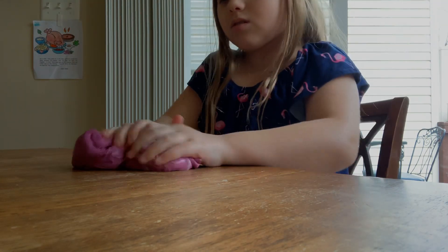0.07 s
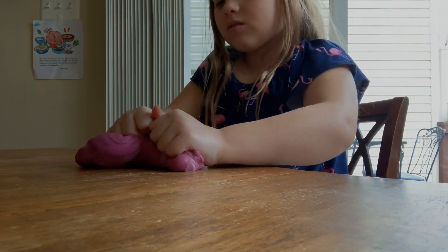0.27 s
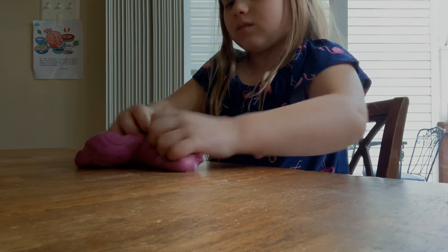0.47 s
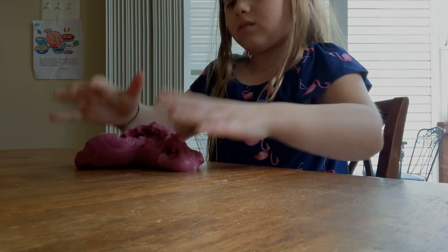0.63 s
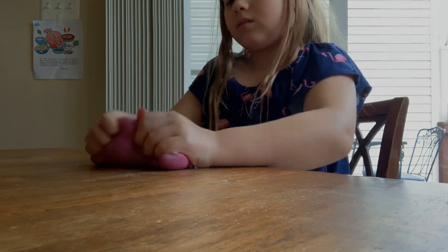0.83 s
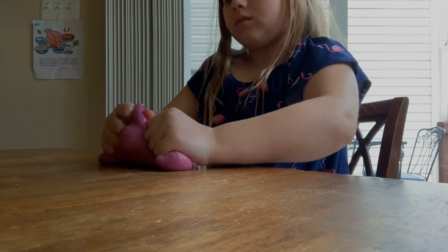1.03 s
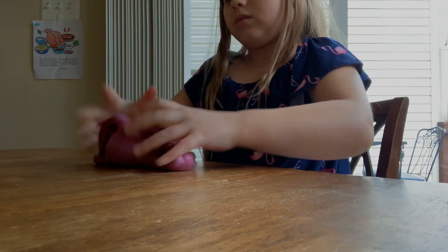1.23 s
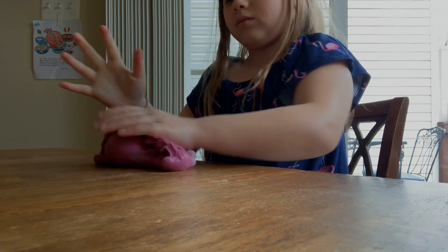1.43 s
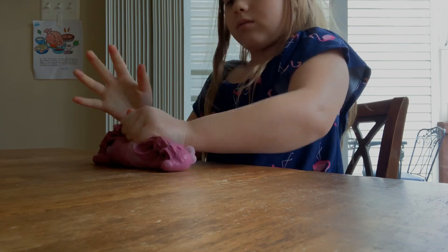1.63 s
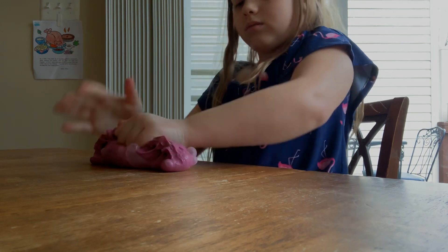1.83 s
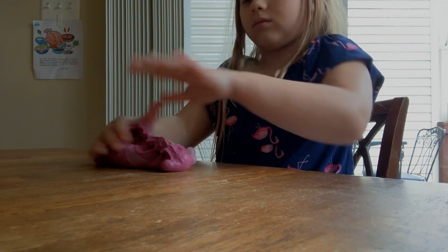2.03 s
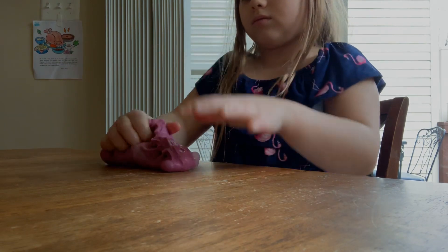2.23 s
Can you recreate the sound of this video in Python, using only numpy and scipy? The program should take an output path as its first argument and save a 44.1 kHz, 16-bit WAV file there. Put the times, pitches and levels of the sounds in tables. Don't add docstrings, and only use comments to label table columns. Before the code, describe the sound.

Trapped air snaps out of soft slime in three bursts, the first loudest and thickest, with tiny squeaks, a brief fizz and dull thuds on wood; close small microphone, short room echo, low hum.

```python
import sys
import numpy as np
from scipy import signal
from scipy.fft import rfft, irfft, next_fast_len
from scipy.io import wavfile
from scipy.ndimage import uniform_filter1d

SR = 44100
rng = np.random.default_rng(int(sys.argv[2]) if len(sys.argv) > 2 else 0)


def level_to_linear(level):
    exponent = np.asarray(level, float) / 20
    return 10 ** exponent


def store_pcm(level_fs):
    pcm = np.round(np.clip(level_fs, -1, 1) * 32767).astype(np.int16)
    wavfile.write(sys.argv[1], SR, np.atleast_2d(pcm).T)


N = 101429


def rms_one(x):
    return x / np.sqrt(np.mean(x ** 2) + 1e-20)


def at_hz(points, hz):
    table_hz, table_db = np.array(points).T
    return np.interp(np.log(hz), np.log(table_hz), table_db)


def drift(rate_hz):
    r = np.exp(-2 * np.pi * rate_hz / SR)
    slow = signal.lfilter([1], [1, -2 * r, r * r], rng.standard_normal(2 * N))
    return rms_one(slow[N:])


def add(out, s, shape):
    i = int(s * SR)
    out[i:i + len(shape)] += shape[:len(out) - i]


def butter(x, order, hz, kind):
    return signal.sosfilt(signal.butter(order, hz, kind, fs=SR, output="sos"), x)


def resonate(x, hz, r):
    return signal.lfilter([1, 0, -1], [1, -2 * r * np.cos(2 * np.pi * hz / SR), r * r], x)


def span(t, s, length_s, edge_s):
    return np.clip(np.minimum(t - s, s + length_s - t) / edge_s, 0, 1)


# frequency in Hz, level in dB per Hz.
HUM_SPECTRUM = [(15, -77), (25, -32.5), (59, -0.5), (277, -6.5), (405, -7), (503, -4), (1160, -6.5),
                (1940, -20.5), (5500, -44), (16000, -61.5)]
HUM_DB = -53.5


def hum():
    hz = np.maximum(np.arange(N // 2 + 1) * SR / N, 10)
    spectrum = rfft(rng.standard_normal(N)) * level_to_linear(at_hz(HUM_SPECTRUM, hz))
    return level_to_linear(HUM_DB) * rms_one(irfft(spectrum, N))


# start in seconds, length in seconds,
# hiss level in dB.
HANDLING = [
    (0.013, 0.603, -59),
    (0.844, 0.501, -70),
    (1.618, 0.4705, -59),
    (2.277, 0.13, -70.5),
]
HISS_FROM_HZ, HISS_EDGE_S = 5200, 0.0296


def hiss():
    t = np.arange(N) / SR
    gate = sum(level_to_linear(db) * span(t, s, length_s, HISS_EDGE_S) for s, length_s, db in HANDLING)
    return gate * butter(rng.standard_normal(N), 1, HISS_FROM_HZ, "high")


ROOM_DB, ROOM_ONSET_S, SPLIT_HZ = -13, 0.0029, 9000
BASS_HZ, BASS_T60_S = 4000, 0.5835
MID_T60_S, TREBLE_T60_S, TREBLE_DB = 0.26, 0.28, 3


def room(x):
    t = np.arange(SR) / SR
    low = butter(rng.standard_normal(SR), 4, SPLIT_HZ, "low")
    high = butter(rng.standard_normal(SR), 4, SPLIT_HZ, "high")
    bass = butter(low, 1, BASS_HZ, "low")
    tail = bass * level_to_linear(-60 * t / BASS_T60_S)
    tail += (low - bass) * level_to_linear(-60 * t / MID_T60_S)
    tail += high * level_to_linear(TREBLE_DB - 60 * t / TREBLE_T60_S)
    tail *= np.minimum(t / ROOM_ONSET_S, 1)
    return level_to_linear(ROOM_DB) * signal.fftconvolve(x, tail / np.sqrt(np.sum(tail ** 2)))[:N]


# start in seconds, level in dB, pitch in Hz.
THUD_HITS = [(.257, -25, 410), (2.01, -46, 900), (0.302, -30.5, 296), (0.601, -40, 297.5), (.61, -55, 450),
             (0.979, -39.5, 392), (1.761, -42.5, 332), (1.277, -44.5, 332.7), (1.735, -35, 721.3),
             (2.003, -40, 308.7), (2.06, -36.5, 282)]
THUD_WIDTH_HZ, THUD_ONSET_S, THUD_DECAY_S = 80, 0.0071, 0.01746


def thuds():
    out, t = np.zeros(N), np.arange(8192) / SR
    r = np.exp(-np.pi * THUD_WIDTH_HZ / SR)
    envelope = np.exp(-t / THUD_DECAY_S) * np.minimum(t / THUD_ONSET_S, 1)
    for s, db, hz in THUD_HITS:
        noise = level_to_linear(db) * rng.standard_normal(len(t)) * envelope
        add(out, s, np.sqrt(1 - r) * resonate(noise, hz, r))
    return out


BRIGHT_TAIL_START_S, BRIGHT_TAIL_DB, BRIGHT_TAIL_ONSET_S, BRIGHT_TAIL_T60_S, BRIGHT_TAIL_FROM_HZ = 0.456, -27, 0.0032, 0.29, 9900


def bright_tail():
    t = np.arange(N) / SR - BRIGHT_TAIL_START_S
    noise = butter(rng.standard_normal(N), 2, BRIGHT_TAIL_FROM_HZ, "high")
    decay = level_to_linear(BRIGHT_TAIL_DB - 60 * np.maximum(t, 0) / BRIGHT_TAIL_T60_S)
    return noise * np.clip(t / BRIGHT_TAIL_ONSET_S, 0, 1) * decay


# start in seconds, length in seconds, pitch in Hz, end pitch in Hz,
# level in dB, roughness from 0 to 1.
SLIT_SQUEAKS = [
    (0.2015, 0.017, 3110, 3230, -31, .85),
    (0.943, 0.009, 2750, 2400, -33, .35),
    (1.670, 0.0076, 3360, 5500, -45, .5),
]
OCTAVE_DB, OCTAVE_LOSS_DB_PER_OCTAVE = 2, 59.5


def squeaks():
    out = np.zeros(N)
    for s, length_s, hz, end_hz, db, rough in SLIT_SQUEAKS:
        n = int(length_s * SR)
        wobble = uniform_filter1d(rng.standard_normal(1500), size=24)[:n] * 5
        phase = 2 * np.pi * np.cumsum(np.linspace(hz, end_hz, n)) / SR + rough * wobble
        octave = level_to_linear(OCTAVE_DB - OCTAVE_LOSS_DB_PER_OCTAVE * np.log2(hz / 2600))
        tone = np.sin(phase) + octave * np.sin(2 * phase)
        flutter = 1 + rough * wobble[::-1]
        add(out, s, level_to_linear(db) * signal.windows.tukey(n, .5) * flutter * tone)
    return out


# start in seconds, length in seconds, level in dB,
# swell to the end in dB.
PEEL_STROKES = [(-0.006, 0.1777, -85.5, 41.5), (0.182, 0.1697, -44.5, 14), (0.356, 0.0573, -41, 27),
                (0.43, 0.1314, -39, -13.5), (0.54, 0.1184, -42.5, 3.5), (0.825, 0.133, -56.5, -0.5),
                (0.896, 0.217, -47, -1.5), (1.235, 0.1427, -48, 8.5), (1.648, 0.1172, -48, 7),
                (1.773, 0.148, -46, -13.5), (1.982, 0.1325, -43, -10), (2.047, 0.0318, -35, 1.5),
                (2.269, 0.07, -61, 0)]
# frequency in Hz, level in dB per Hz.
GRAIN_SPECTRUM = [(200, -3.5), (500, -5.5), (1500, -5), (3500, -11.5), (7000, -7), (9000, -12.5),
                  (16000, -19.5)]
PEEL_EDGE_S, GRAINS_PER_S, CLUMP_DB, CLUMP_HZ = 0.03066, 8000, 2, 60
GRAIN_SPREAD_DB, GRAIN_T60_CYCLES = 3, 6.1
PATCH_DB, PATCH_HZ = 4.5, 10


def peel():
    t = np.arange(N) / SR
    effort = np.zeros(N)
    for s, length_s, db, swell_db in PEEL_STROKES:
        effort += level_to_linear(db + swell_db * (t - s) / length_s) * span(t, s, length_s, PEEL_EDGE_S)
    sizes = level_to_linear(GRAIN_SPREAD_DB * np.minimum(rng.exponential(1, N), 4)) * rng.choice([-1, 1], N)
    born = rng.random(N) < GRAINS_PER_S * level_to_linear(CLUMP_DB * drift(CLUMP_HZ)) / SR
    pitch_index = rng.integers(0, 20, N)
    crackle = np.zeros(N)
    for k, hz in enumerate(np.geomspace(250, 15000, 20)):
        grains = sizes * born * (pitch_index == k) + 1e-18
        ring = resonate(grains, hz, level_to_linear(-60 * hz / (GRAIN_T60_CYCLES * SR)))
        level = level_to_linear(at_hz(GRAIN_SPECTRUM, hz) + PATCH_DB * drift(PATCH_HZ))
        crackle += rms_one(ring) * level * np.sqrt(hz)
    return effort * rms_one(crackle)


# time in seconds, peak in dB, pitch in Hz, length in cycles.
SOFT_BUBBLES = [(0.123, -41, 4900, 14), (.138, -18.5, 1299, 1.8), (0.213, -34.5, 5000, 4.1),
                (0.2596, -35, 7000, 2.34), (0.2649, -22, 6000, 4), (0.2711, -13, 6500, 4.2),
                (.2827, -18.5, 5000, 2.65), (0.2909, -21.5, 3480, 3.2), (0.306, -14, 6540, 5.4),
                (.33, -21.5, 7340, 5.3), (.33, -21, 11000, 4.4), (0.3342, -12.5, 3000, 1.8),
                (0.3469, -20, 4000, 2.3), (.3635, -35.5, 11000, 2.4), (.3695, -36.5, 6000, 3.2),
                (0.382, -22, 6430, 3), (.385, -13.5, 11000, 4), (0.3956, -14.5, 6000, 2.5),
                (0.3975, -15.5, 8000, 3), (.41, -14.5, 10140, 3.4), (0.4168, -20, 4000, 2.7),
                (0.4345, -4.5, 10140, 2.76), (0.4372, -22, 9970, 3.6), (.561, -29, 4000, 1.65),
                (.5785, -36, 4500, 3), (0.5887, -32, 2700, 5.1), (0.6018, -29.5, 7000, 4.9),
                (0.619, -35.5, 2900, 8.9), (0.6256, -28, 4960, 7.1), (0.627, -26, 5460, 2.2),
                (1.253, -34, 6470, 4.65), (1.257, -44.5, 10900, 4.1), (1.279, -36.5, 2000, 1.9),
                (1.2828, -29.5, 4000, 1.7), (1.303, -30, 6740, 5.7), (1.328, -37.5, 4000, 3.9),
                (1.33, -36, 7080, 4.7), (1.338, -30, 7540, 5), (1.3397, -34.5, 4530, 3.3),
                (1.728, -23, 6000, 2.9), (1.73, -22, 7500, 4.8), (1.736, -16, 9030, 3.6),
                (1.751, -31.5, 4000, 3.4), (1.86, -34.5, 4000, 6.2), (1.875, -34, 10000, 4.8),
                (0.8186, -50.5, 4360, 1.94), (.826, -46, 4900, 6), (0.8476, -37.5, 2600, 2.5),
                       (.894, -42.5, 5500, 4), (0.932, -33, 2800, 3.4), (.9675, -31, 8000, 3),
                       (0.9735, -26.5, 9500, 2.9), (1.0555, -35.5, 11000, 5), (1.102, -38, 14400, 5),
                       (1.114, -37, 6000, 2.55), (1.1339, -24.5, 7450, 6.6)]


def bubbles():
    out, t = np.zeros(N), np.arange(400) / SR - .0045
    for s, db, hz, cycles in SOFT_BUBBLES:
        swell = np.exp(-8 * (t * hz / cycles) ** 2)
        add(out, s + t[0], level_to_linear(db) * swell * np.sin(2 * np.pi * hz * t + 1))
    return out


SWELL_CYCLES = 0.06


def burst(t, hz, damping):
    turns = np.maximum(t * hz + .3, 0)
    swell = 1 - np.exp(-turns / SWELL_CYCLES)
    shape = swell * np.exp(-np.pi * damping * turns) * np.sin(2 * np.pi * turns)
    return shape / np.abs(shape).max()


# time in seconds, peak in dB, pocket pitch in Hz, push in dB, snap in dB.
FIRST_FOLD_POPS = [(0.1075, -15, 2026, -7, -5), (0.1941, -16.5, 1155, -16, -14.5),
                   (0.2011, -12, 3017, 6.5, -24.5), (0.2335, -19.5, 983.4, 6, -31),
                   (0.2394, 2, 3613, -22.5, -14.5), (0.2499, -10, 1268, 3.5, -34.5),
                   (0.2531, -8, 4672, -21, -1), (0.2546, -5, 1148, 11.5, -2.5),
                   (0.2669, 3.5, 8280, -32.5, -21), (0.2682, 6, 9160, -14.5, -10),
                   (0.287, -13, 4967, -5, -11.5), (0.2891, -14, 3880, -9, -18),
                   (0.2931, -17.5, 1286, 9, -8), (0.3042, -9.5, 3400, -2, -22),
                   (0.3301, -34, 7130, -23.5, -1.5), (0.3434, -13.5, 5990, -19, 7.5),
                   (0.3549, -0.5, 5220, -13.5, -32.5), (0.3731, -20.5, 8125, -5.5, -7),
                   (0.3835, -1, 6550, -17, -13), (0.4038, -1, 5680, -51.5, -5),
                   (0.4215, 5.5, 10470, -43, -13), (0.6159, -24.5, 4580, -24.5, -23)]
# time in seconds, peak in dB, pocket pitch in Hz, push in dB, snap in dB.
SECOND_FOLD_POPS = [(0.8798, -29, 1390, -21.5, -24), (0.8814, -24.5, 5940, -11.5, -38),
                    (0.906, -28.5, 10900, -6.5, -3.5), (0.915, -21.5, 7800, -27, -4.5),
                    (0.921, -32, 1240, -12, -24), (0.9237, -51, 1240, 5.5, -15.5),
                    (0.9236, -13, 7950, -36.5, 8), (0.9386, -22, 4270, -25.5, -12),
                    (0.9559, -20.5, 2420, -7.5, 7.5), (0.9588, -20, 3160, -29.5, -15),
                    (0.9761, -24.5, 6120, 2.5, -29.5), (0.9778, -2, 7700, -53, -8),
                    (0.9889, -21, 6000, -20, 3), (1.006, -27.5, 2150, -20.5, -13),
                    (1.0099, -24.5, 3500, -1.5, -3.5), (1.0298, -16.5, 5200, -16, -16.5),
                    (1.034, -7.5, 7400, -11, 7), (1.041, -2.5, 11000, -17, -1),
                    (1.0434, -10.5, 3700, -20.5, -19), (1.0512, -21.5, 2840, -8, 7.5),
                    (1.0715, -22.5, 5600, -27.5, 0), (1.1163, -23, 6300, -12.5, -0.5),
                    (1.1318, -2, 7300, -45, -66)]
# time in seconds, peak in dB, pocket pitch in Hz, push in dB, snap in dB.
THIRD_FOLD_POPS = [(1.6351, -24, 1180, 2.5, -1.5), (1.6372, -24, 4100, -9, -25.5),
                   (1.646, -24, 4470, -8.5, -9.5), (1.6497, -20, 4240, -6.5, 4),
                   (1.6598, -3.5, 5290, -45.5, -51), (1.684, -13, 6000, -27.5, -27.5),
                   (1.7077, 2, 7250, -25.5, -45.5), (1.7204, -26.5, 4500, -20.5, -6.5),
                   (1.765, -22.5, 6760, -31.5, -31), (1.7686, -15, 7520, -19.5, -6),
                   (1.7843, -25, 2790, -11, -1.5), (1.8172, -18.5, 5260, -34, 5.5),
                   (1.8463, -11.5, 5556, -26, -32.5), (1.8875, -17, 6420, -50.5, 1),
                   (2.0583, -23, 4500, -4, -10), (2.062, -29, 2344, -2, -19), (2.2629, -28, 4360, -12, 5)]
POP_DB, POCKET_DAMPING = 3.5, 0.4726
PUSH_DB, PUSH_HZ, PUSH_DAMPING = -5, 900, 0.844
SNAP_HZ, SPRAY_DB, SPRAY_DECAY_S = 13000, -12, .001


def pops():
    out, t = np.zeros(N), np.arange(400) / SR - .001
    for s, db, hz, push_db, snap_db in FIRST_FOLD_POPS + SECOND_FOLD_POPS + THIRD_FOLD_POPS:
        ring = np.gradient(burst(t, hz, POCKET_DAMPING)) * SR / (2 * np.pi * hz)
        core = ring + level_to_linear(snap_db) * burst(t, SNAP_HZ, POCKET_DAMPING)
        push = level_to_linear(push_db + PUSH_DB) * burst(t, PUSH_HZ, PUSH_DAMPING)
        shreds = rng.standard_normal(len(t)) * np.exp(-t / SPRAY_DECAY_S) * (t > 0)
        spray = np.convolve(shreds, core)[44:44 + len(t)] * np.sqrt(hz / SR)
        add(out, s + t[0], level_to_linear(db + POP_DB) * (core + push + level_to_linear(SPRAY_DB) * spray))
    return out


LOW_CUT_HZ = 250


def scene():
    slime = pops() + bubbles() + peel() + squeaks() + thuds() + bright_tail()
    slime = butter(slime, 3, LOW_CUT_HZ, "high")
    return (slime + room(slime) + hum() + hiss())[None]


LOW_DELAY_CYCLES, DELAY_FROM_HZ, DELAY_TO_HZ = 2.0, 150, 2500
GATE_HZ, GATE_SHUT_DB, GATE_EDGE_S = 7669, -6, 0.15
DUCK_ABOVE_DB, DUCK_DB_PER_DB, DUCK_BACK_DB_PER_S, DUCK_LAG_S = -10.5, 0.38, 897, 0.00093
CUTOFF_HZ = 17000


def delay_lows_and_gate(dry):
    size = next_fast_len(N + SR // 4)
    hz = np.arange(size // 2 + 1) * SR / size
    lag_cycles = LOW_DELAY_CYCLES * np.log((1 + hz / DELAY_FROM_HZ) / (1 + hz / DELAY_TO_HZ))
    spectrum = rfft(dry, size) * np.exp(-2j * np.pi * lag_cycles)
    x = irfft(spectrum, size)[:, :N]
    treble = irfft(spectrum / (1 + (GATE_HZ / (hz + 1)) ** 12), size)[:, :N]
    t = np.arange(N) / SR
    shut = 2 - sum(span(t, s - GATE_EDGE_S, length_s + 2 * GATE_EDGE_S, GATE_EDGE_S)
                   for s, length_s, _ in HANDLING)
    return x - treble * shut * (1 - level_to_linear(GATE_SHUT_DB))


def duck(x):
    slope = DUCK_BACK_DB_PER_S * np.arange(N) / SR
    level_db = 20 * np.log10(np.abs(x[0]) + 1e-9)
    held_db = np.maximum.accumulate(level_db + slope) - slope
    over_db = np.maximum(held_db - DUCK_ABOVE_DB, 0)
    lag = int(DUCK_LAG_S * SR)
    late_db = uniform_filter1d(np.r_[np.zeros(lag), over_db[:-lag]], size=40)
    return x * level_to_linear(-DUCK_DB_PER_DB * late_db)


def top_cut(x):
    return signal.sosfilt(signal.butter(12, 16990, fs=SR, output="sos"), x)


def record(dry):
    x = np.clip(duck(delay_lows_and_gate(dry)), -.93, .93)
    x = signal.sosfilt(signal.cheby2(10, 60, CUTOFF_HZ, fs=SR, output="sos"), x)
    return top_cut(x)


dry = scene()
out = record(dry)
store_pcm(out)
```